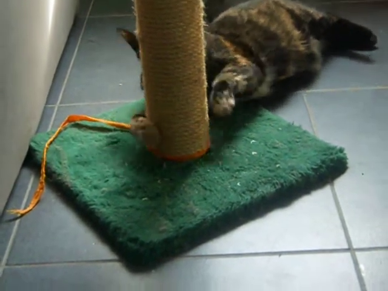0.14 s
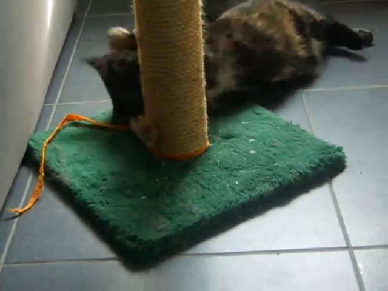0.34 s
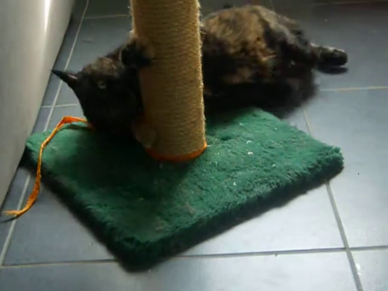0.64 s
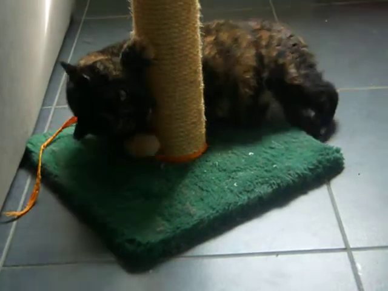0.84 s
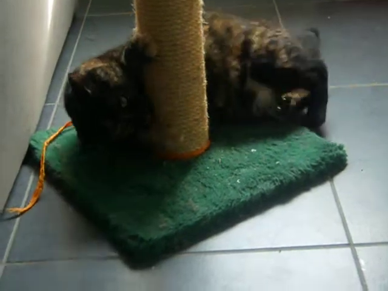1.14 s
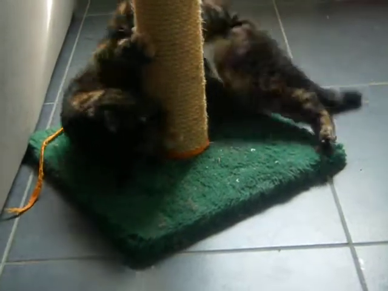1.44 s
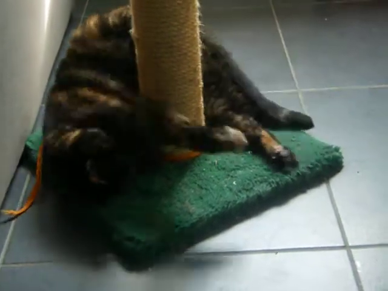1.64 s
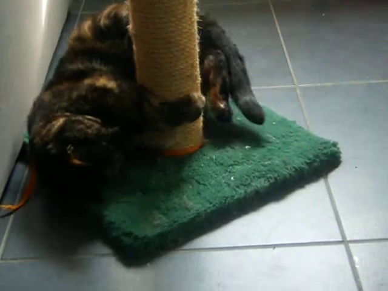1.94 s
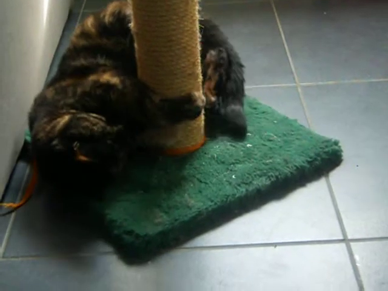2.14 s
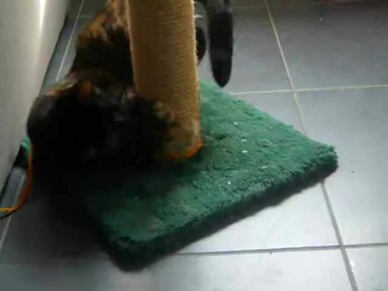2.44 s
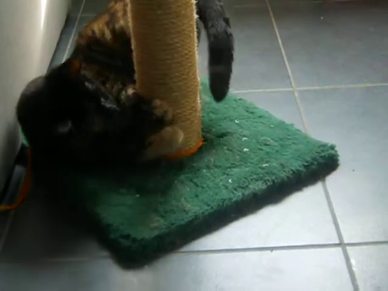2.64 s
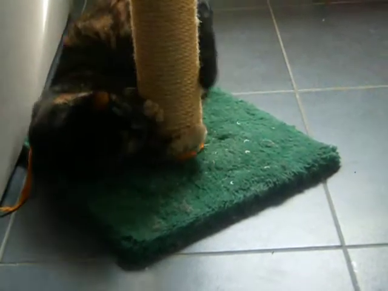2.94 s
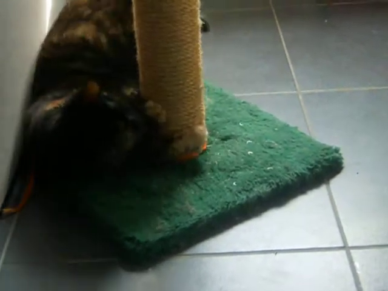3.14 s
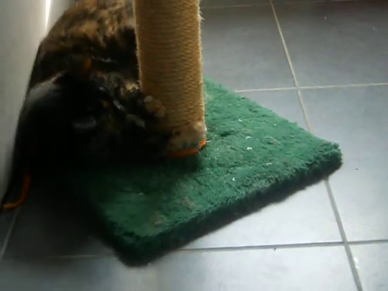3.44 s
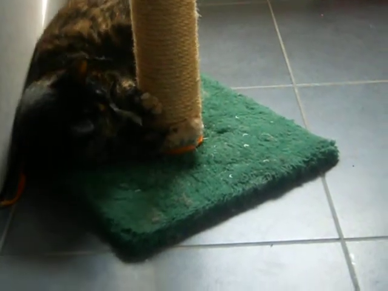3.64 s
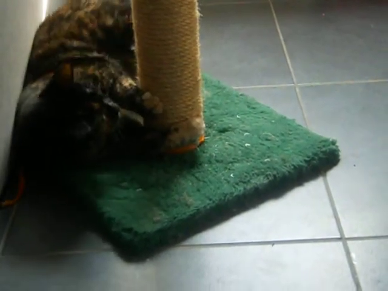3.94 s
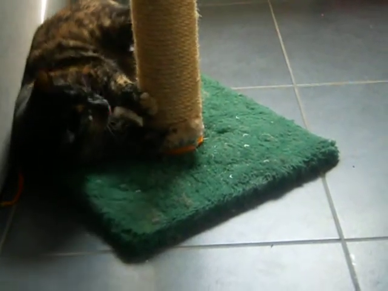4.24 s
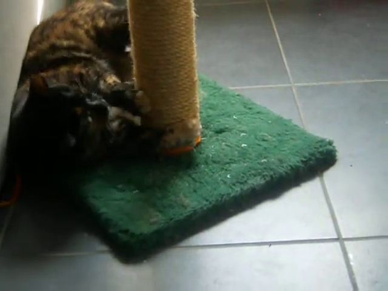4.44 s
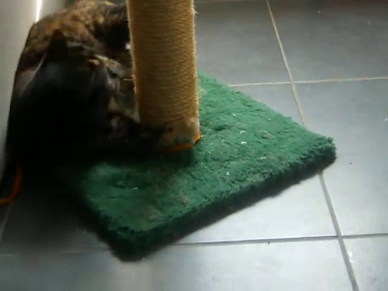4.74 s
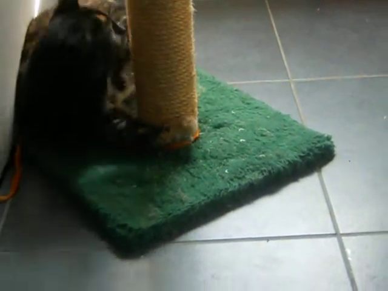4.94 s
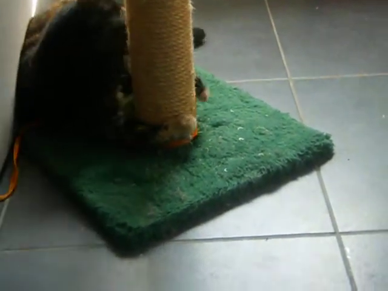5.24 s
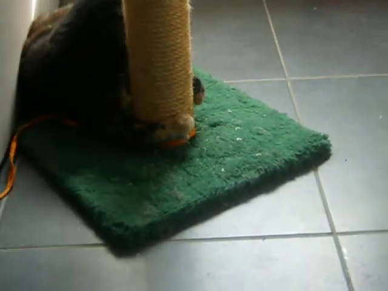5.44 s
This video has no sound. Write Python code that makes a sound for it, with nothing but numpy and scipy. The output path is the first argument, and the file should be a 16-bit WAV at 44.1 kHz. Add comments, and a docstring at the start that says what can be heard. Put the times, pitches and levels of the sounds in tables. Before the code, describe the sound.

A cat claws at a rope-covered scratching post in a small tiled room. The claws hook and snap free with sharp, dry clicks, mixed with brief scratchy paw drags and faint hollow knocks from the post. The clicks bunch up early, peaking in a short tearing scratch, then thin out to scattered ticks. A microphone a little way off picks up some room echo and a steady hiss.

```python
"""Cat at a scratching post

A cat lies on the tiled floor of a small hard room and claws at a rope-covered post. Claws hook in the
rope and snap free, fibres tear, paws brush along it and the hollow post knocks faintly. A mono camera
microphone with a steady hiss stands far enough off to hear about as much room as direct sound."""
import sys
import numpy as np
from scipy import signal
from scipy.fft import rfft, irfft, next_fast_len
from scipy.io import wavfile

SR = 44100
rng = np.random.default_rng(int(sys.argv[2]) if len(sys.argv) > 2 else 0)


def put_to_file(sound):
    """Save the sound as 16-bit audio at rate SR, in the file named by the first command-line argument."""
    columns = np.atleast_2d(sound).T  # one column per channel
    safe = np.clip(columns, -1, 1)
    whole_steps = np.round(safe * 32767)
    wavfile.write(sys.argv[1], SR, whole_steps.astype(np.int16))


N = 246078

# resonances of the taut rope fibres: (frequency [Hz], width [Hz], gain [dB])
ROPE_MODES = [(2476, 390, 5), (2550, 24, 0.5), (4050, 290, -14), (6050, 270, -4.5), (6700, 840, -3)]
# resonances of the hollow post on its base: (frequency [Hz], width [Hz], gain [dB])
POST_MODES = [(255, 170, 0.5), (628, 146, 5.5), (946, 200, 4), (1540, 520, -4), (2100, 520, -3)]


def claw_snaps(ring_width_hz=620, rope_db=-5.0, size=4096):
    """A claw snaps free with a click and a moment of fraying; fibre and rope ring, the post shudders."""
    # (time [s], level [dB], pitch of the plucked fibre [Hz], post relative to the crack [dB])
    releases = [(.1669, -22.5, 4420, -15), (.3717, -13.5, 4210, -9.5), (.4112, -12, 2620, -10.5),
                (.7505, -22, 3700, -1.5), (.782, -18, 6170, -13), (.8962, -9, 3920, -16),
                (1.205, -6.5, 5270, -4.5), (1.2937, -19.5, 6860, 2.5), (1.4379, -2.5, 4170, -11),
                (1.4731, -15, 2400, -20), (1.4834, -9.5, 2520, -13), (2.145, -21, 4200, -11),
                (2.8442, -11, 6000, -3.5), (2.8505, -11, 3980, -2.5), (3.0273, -15, 3380, -10.5),
                (4.1399, -25.5, 2550, 2.5), (4.3971, -16, 6500, -12), (4.7818, -14, 3040, -4),
                (5.0, -18.5, 3700, -17), (5.1903, -22, 3400, -14)]
    fray, fray_s = 0.6, 0.0018
    shudder, shudder_s = 0.07, 0.013
    light_pluck_db, light_ring_db, stiff_hz = -22.5, 14, 4300
    out = np.zeros(N + size)
    age = np.arange(size) / SR
    for time_s, level_db, fibre_hz, post_db in releases:
        noise = rng.standard_normal(size)
        force = fray * noise * np.exp(-age / fray_s)
        force[0] = 1  # the click
        force = even_out(force, share=0.66)
        # a light pluck lets the fibre ring; harder ones mostly crack, and short stiff fibres hardly ring
        hard_loss_db = 0.77 * (level_db - light_pluck_db)
        stiff_loss_db = 36 * max(0, np.log2(fibre_hz / stiff_hz))
        ring_db = light_ring_db - hard_loss_db - stiff_loss_db
        crack = band(force, low_hz=2080, high_hz=7470)
        fibre = from_db(ring_db) * resonance(crack, fibre_hz, ring_width_hz)
        rope = from_db(rope_db) * body(crack, ROPE_MODES)
        knock = body(force + shudder * noise * np.exp(-age / shudder_s), POST_MODES)
        snap = unit_energy(crack + fibre + rope) + from_db(post_db) * unit_energy(knock)
        start = int(time_s * SR)
        out[start:start + size] += from_db(level_db) * snap
    return disperse(out[:N])


def paw_drags(brush_db=-3, fibre_db=-1, post_db=-2, taut_db=-34):
    """A paw brushes over fibres and shakes the post; the harder it pulls, the more the taut rope rings."""
    # (peak time [s], swell time [s], relative crackle level [dB], relative post level [dB])
    strokes = [(.17, 0.041, -59, -57), (.398, 0.019, -60, -44), (.878, 0.012, -53, -44.5),
               (.94, .018, -48, -52.5), (1.427, 0.004, -43.5, -47), (1.476, 0.015, -34.5, -46),
               (1.885, 0.035, -57, -52.5), (2.205, .07, -54.5, -51.5), (2.41, 0.11, -55, -64),
               (2.99, .048, -60, -56), (5.213, 0.022, -60, -49)]
    time = np.arange(N) / SR
    pull, shake = np.zeros(N), np.zeros(N)
    for peak_s, swell_s, crackle_db, shake_db in strokes:
        swell = np.exp(-((time - peak_s) / swell_s) ** 2)
        pull += from_db(crackle_db) * swell
        shake += from_db(shake_db) * swell
    plucks = fibre_slips(per_s=4000, spread_db=3.5)
    tautness = np.clip(pull / from_db(taut_db), 0, 1) ** 0.68
    crackle = rms_one(band(plucks, low_hz=1200, high_hz=7500))
    brush = from_db(brush_db) * np.sqrt(1 - 0.91 * tautness) * crackle
    fibres = from_db(fibre_db) * tautness * rms_one(body(plucks, ROPE_MODES))
    post = from_db(post_db) * rms_one(body(plucks, POST_MODES))
    return pull * (brush + fibres) + shake * post


def fibre_slips(per_s, spread_db):
    """Fibres catch and let go in tiny random clicks of uneven size."""
    sizes = from_db(spread_db * np.minimum(rng.exponential(1, N), 4))
    signs = rng.choice([-1, 1], N)
    return sizes * signs * (rng.random(N) < per_s / SR)


def disperse(x, pole=0.602, stages=26):
    """In a stiff surface the highs travel faster: a chain of allpasses makes the lows arrive later."""
    return signal.sosfilt([[-pole, 1, 0, 1, -pole, 0]] * stages, x)


def tiled_room(x, t60_s=0.39, build_s=0.0033, size=22050, stretches=28):
    """Hard echoes from floor and walls, then a short diffuse tail whose paths change as the paws move."""
    # nearest surfaces: (delay [s], level [dB])
    reflections = [(.0007, -19.5), (.0016, -21), (.0027, -12), (.0052, -17), (0.0107, -12.5),
                   (0.0148, -16.5)]
    # tone of the diffuse tail: (frequency [Hz], gain [dB])
    tail_tone = [(100, -3), (600, -3), (1000, 1), (1700, 1), (2600, -2.5), (3600, -2), (5000, -2.5),
                 (6500, -0.5), (9000, -2)]
    age = np.arange(size) / SR
    envelope = from_db(-60 * age / t60_s) * (1 - np.exp(-age / build_s))
    tails = np.zeros(N + size)
    for stretch in np.array_split(np.arange(N), stretches):
        paths = unit_energy(envelope * rng.standard_normal(size))
        tail = signal.fftconvolve(x[stretch], paths)
        tails[stretch[0]:stretch[0] + len(tail)] += tail
    echoes = sum(from_db(db) * np.pad(x, (int(delay_s * SR), 0))[:N] for delay_s, db in reflections)
    return x + echoes + colour(tails[:N], tail_tone)


def microphone_hiss(level_db=-47.5):
    """The microphone's steady noise floor, stronger in the lows."""
    # (frequency [Hz], relative density [dB])
    spectrum = [(20, -4), (45, 1), (90, -2), (200, -1.5), (400, -2), (650, -2), (1100, -3.5), (2000, -5.5),
                (4000, -8), (6000, -10), (7500, -11), (9000, -13.5)]
    return from_db(level_db) * rms_one(colour(rng.standard_normal(N), spectrum))


def from_db(db):
    """Decibels to gain."""
    return 10 ** (np.asarray(db) / 20)


def rms_one(x):
    """Scale to rms 1."""
    return x / np.sqrt(np.mean(x ** 2) + 1e-20)


def unit_energy(x):
    """Scale a short sound to energy 1."""
    return x / np.sqrt(np.sum(x ** 2) + 1e-20)


def colour(x, points):
    """Minimum-phase filter that follows a table of (frequency [Hz], gain [dB])."""
    size = 2 * next_fast_len(len(x))
    hz, db = np.transpose(points)
    bin_hz = np.fft.rfftfreq(size, 1 / SR) + 1
    gain = from_db(np.interp(np.log(bin_hz), np.log(hz), db))
    cepstrum = irfft(np.log(gain))
    cepstrum[1:size // 2] *= 2  # folding onto positive time makes the filter causal
    cepstrum[size // 2 + 1:] = 0
    return irfft(rfft(x, size) * np.exp(rfft(cepstrum)))[:len(x)]


def even_out(x, share):
    """Flatten a share of a burst's chance peaks and notches, so that it sounds dry and broad."""
    hz = np.fft.rfftfreq(len(x), 1 / SR) + 1
    spectrum_db = 20 * np.log10(np.abs(rfft(x)) + 1e-3)
    return colour(x, np.column_stack([hz, -share * spectrum_db]))


def band(x, low_hz, high_hz):
    """Gentle band-pass."""
    return signal.sosfilt(signal.butter(2, [low_hz, high_hz], "band", fs=SR, output="sos"), x + 1e-18)


def resonance(x, hz, width_hz):
    """One resonance, gain 1 at its peak."""
    radius = np.exp(-np.pi * width_hz / SR)
    gain = (1 - radius ** 2) / 2
    feedback = [1, -2 * radius * np.cos(2 * np.pi * hz / SR), radius ** 2]
    return signal.lfilter([gain, 0, -gain], feedback, x + 1e-18)


def body(x, modes):
    """Resonances in parallel."""
    return sum(from_db(db) * resonance(x, hz, width_hz) for hz, width_hz, db in modes)


def scene():
    """The cat heard across the room, over the hiss; both channels alike."""
    mono = tiled_room(claw_snaps() + paw_drags()) + microphone_hiss()
    return np.array([mono, mono])


def record(dry):
    """The camera microphone falls away in the treble and ends in a steep cut."""
    # (frequency [Hz], gain [dB])
    treble_response = [(7200, 0), (7650, -3.5), (7950, -15), (8400, -12), (8750, -21), (9100, -39.5)]
    cutoff_hz = 9065
    heard = np.array([colour(channel, treble_response) for channel in dry])
    return signal.sosfilt(signal.ellip(10, .1, 80, cutoff_hz, fs=SR, output="sos"), heard)


dry = scene()
out = record(dry)
put_to_file(out)
```